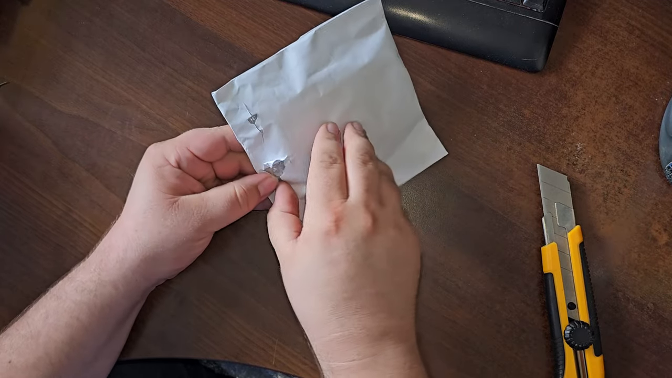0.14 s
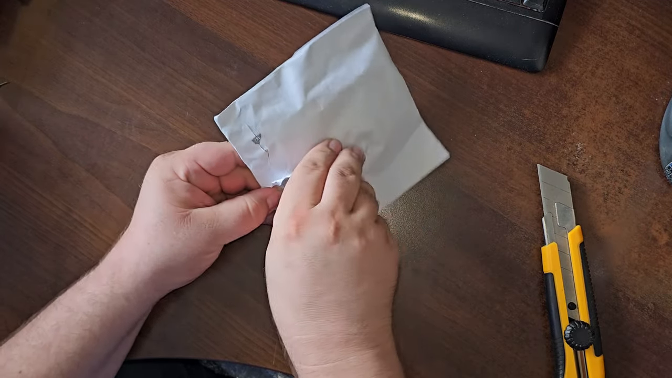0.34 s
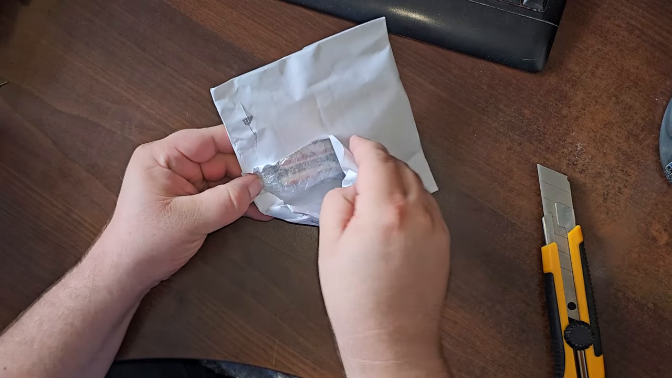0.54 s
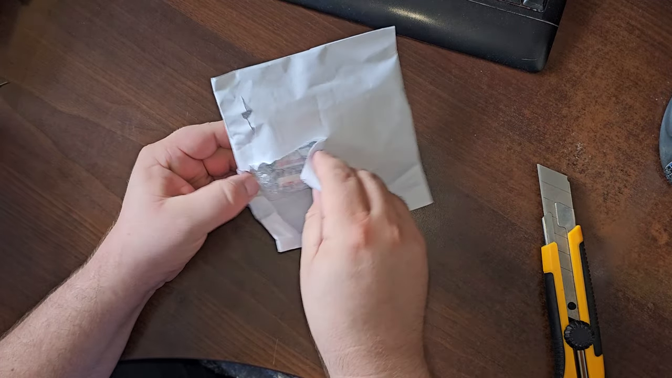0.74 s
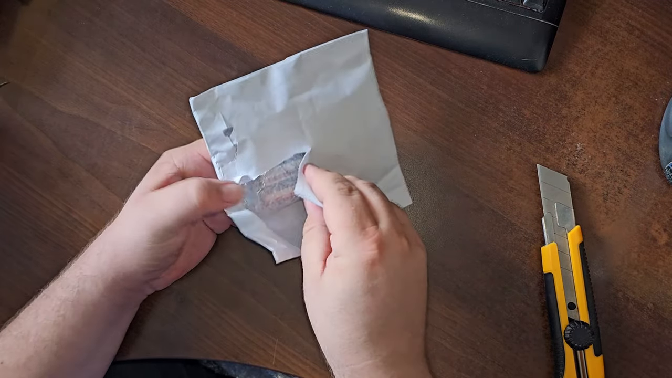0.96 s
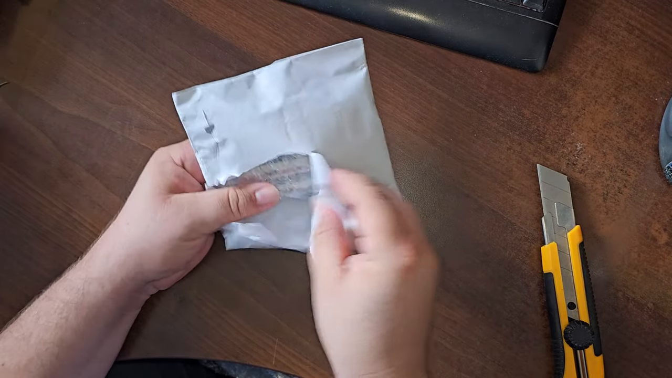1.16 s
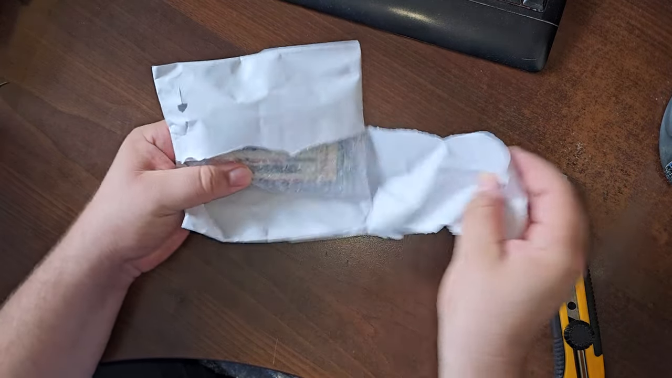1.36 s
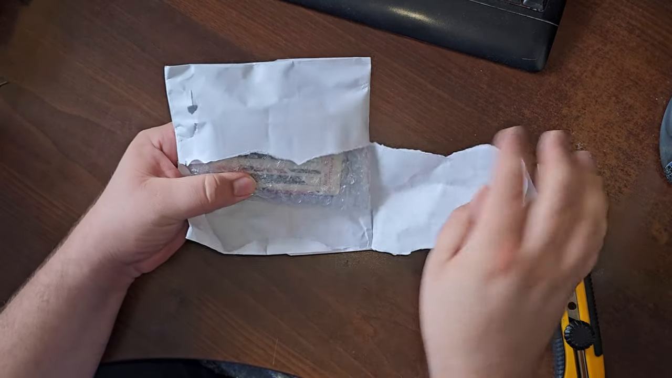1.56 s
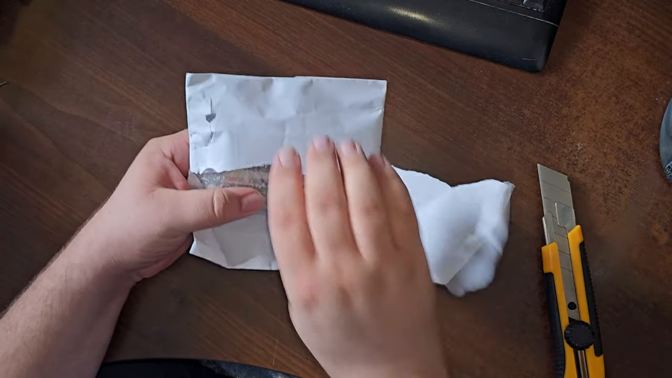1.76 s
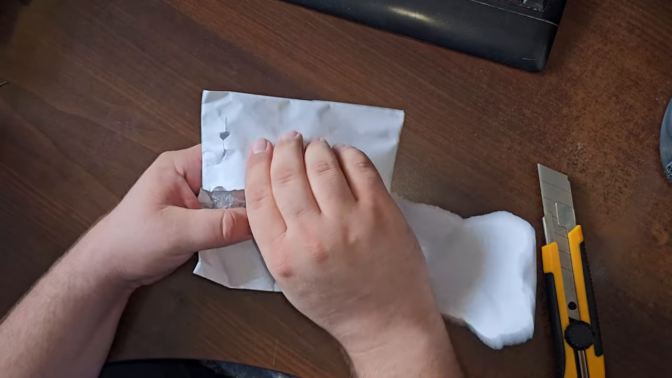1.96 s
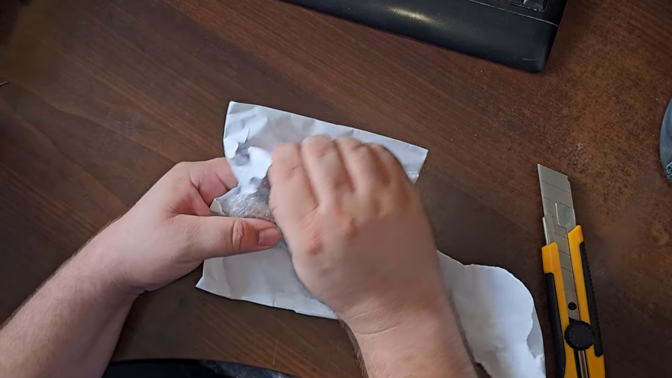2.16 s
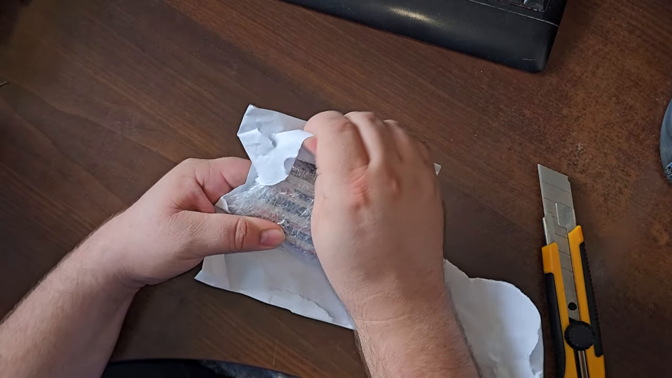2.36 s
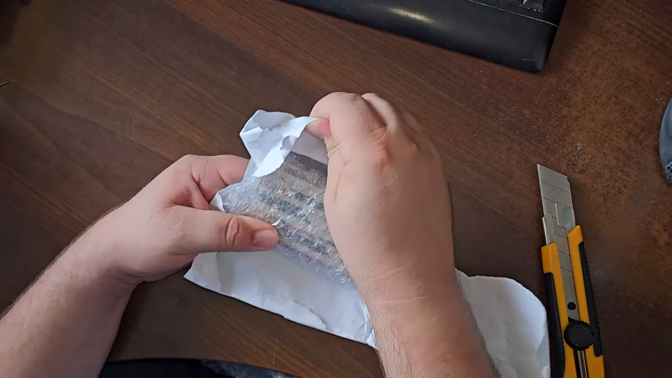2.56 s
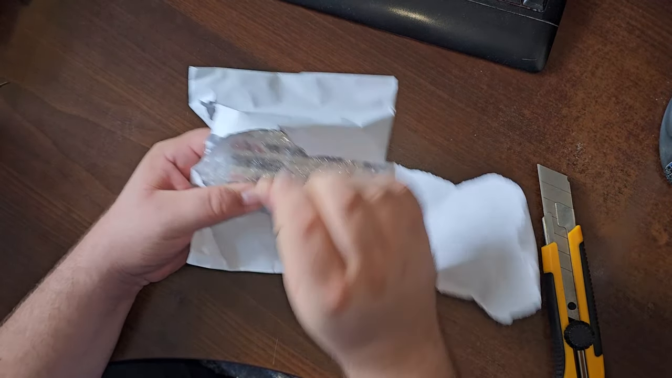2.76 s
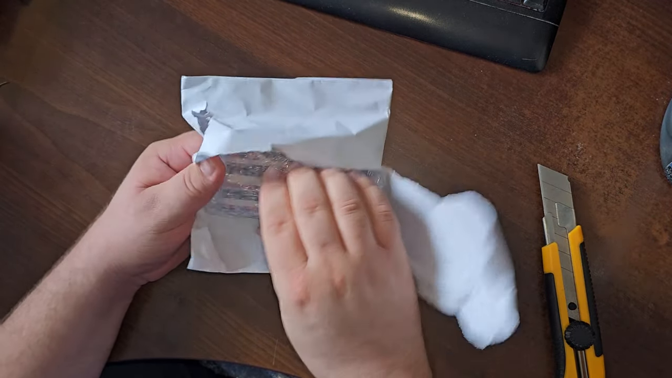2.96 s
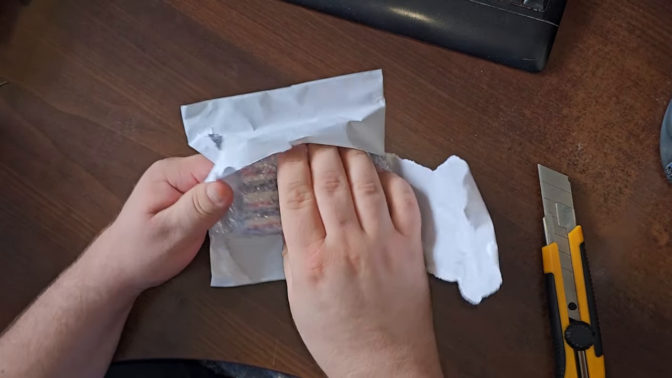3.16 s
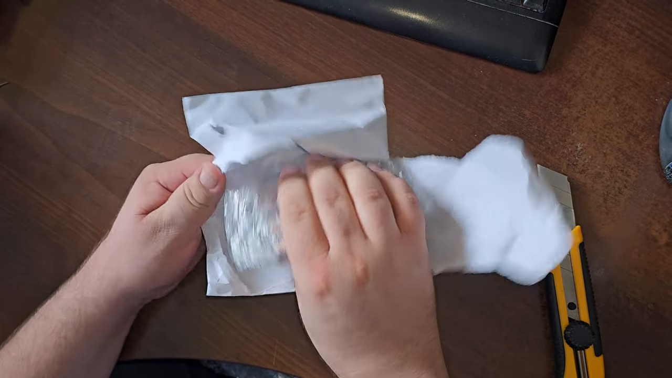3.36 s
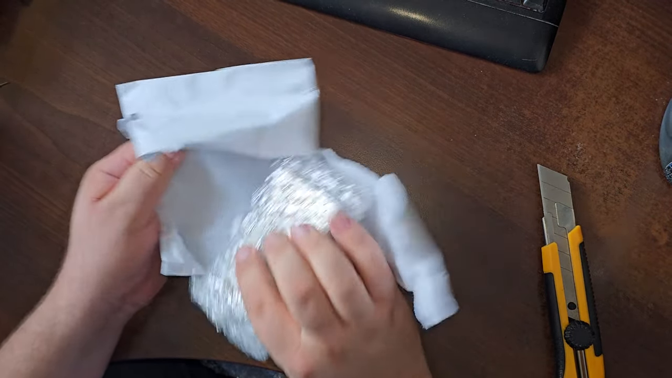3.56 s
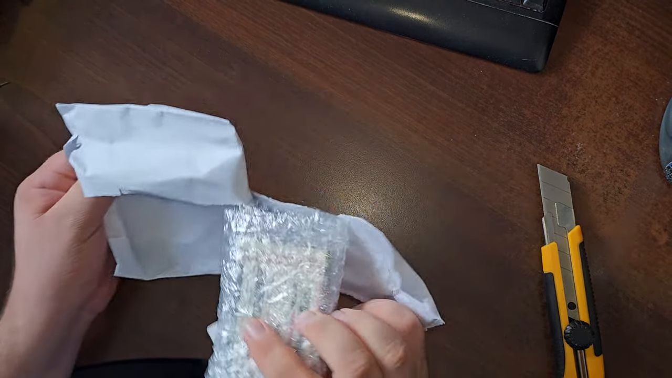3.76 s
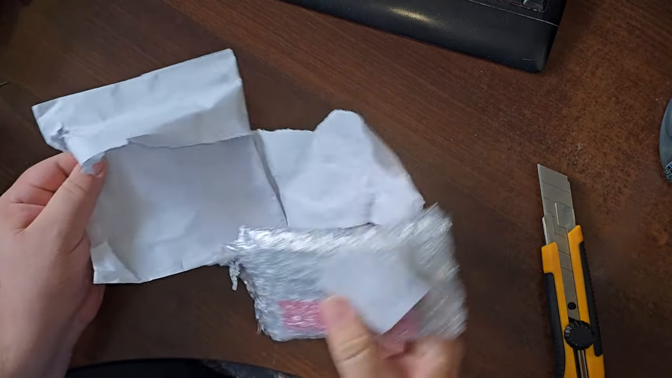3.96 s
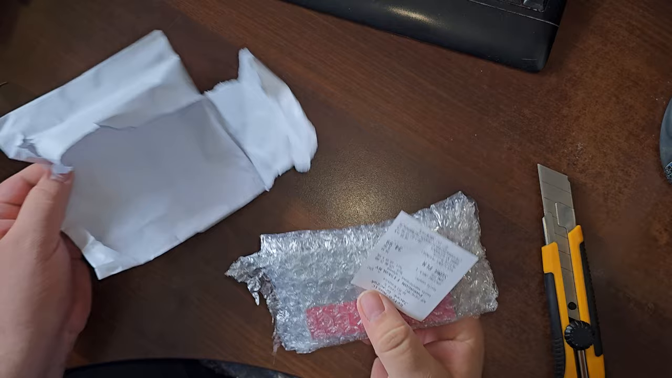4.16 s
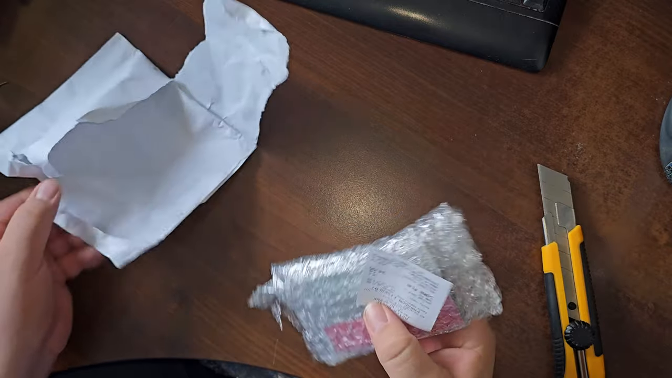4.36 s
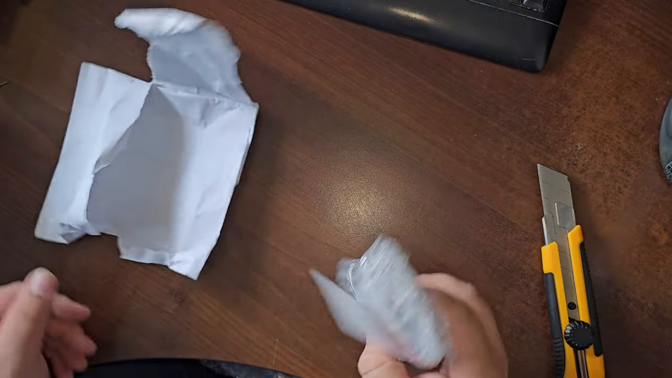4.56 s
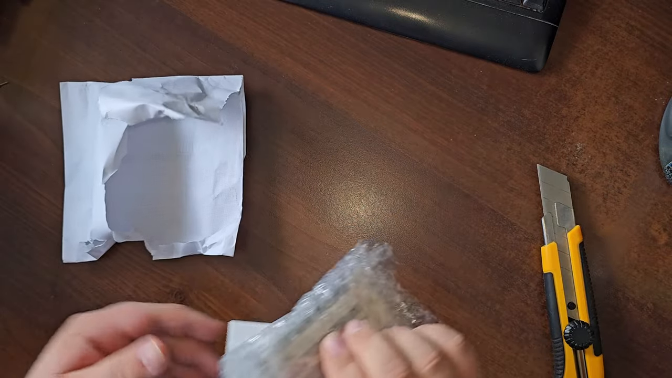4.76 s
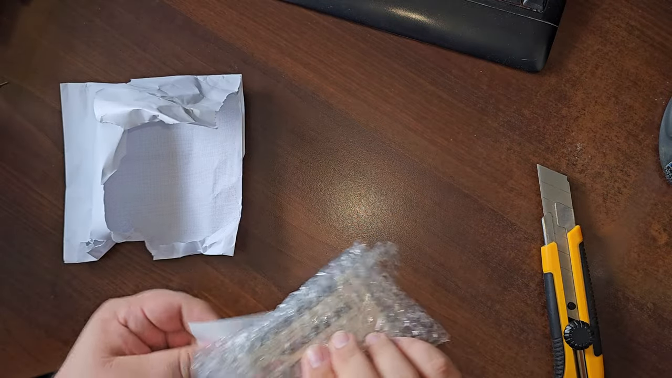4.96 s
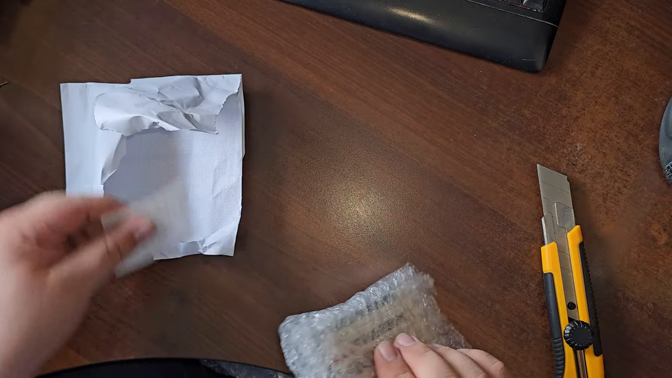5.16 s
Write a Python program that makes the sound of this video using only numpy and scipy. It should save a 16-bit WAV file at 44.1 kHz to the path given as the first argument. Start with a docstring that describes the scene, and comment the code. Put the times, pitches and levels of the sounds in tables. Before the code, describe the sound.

A close, dry stereo sound, slightly to the left, in a small room with soft low air noise and faint hum. Fingers rustle a paper envelope from the start, with small crackles and a crease snap. At about 0.3-0.6 s a short fibrous rip comes with bright popping creases. Light rubbing follows until the longest, loudest tear at 1.1-1.45 s, coarse and raspy with a fluttering flap. Soft handling continues, then a brief third rip at 2.07-2.2 s. From 2.25 to 2.9 s the paper is folded back with busy crackle and sharp pitched snaps. Around 3-3.9 s bubble wrap crinkles and scrapes as it slides out, while dragging makes a faint desk rumble. A low 60 Hz drone swells from about 3.1 to 3.7 s, then slowly sinks. After 4 s only sparse, gentle film rustles remain, with a small crisp flurry near 4.9 s.

```python
"""A wooden desk in a small humming room, heard close up and in stereo, with the scene slightly to the left.
Hands rip a paper envelope open in three pulls, fold it back and slide out a bubble-wrapped item.
Tearing is a stream of breaking fibres that shakes the loose flap; creases buckle with short pitched snaps.
Paper and plastic film rustle in between as crackle and small rings, the desk rumbles when things drag on it,
and a low drone swells late."""
import sys
import numpy as np
from scipy import signal
from scipy.fft import rfft, irfft, next_fast_len
from scipy.io import wavfile
from scipy.ndimage import uniform_filter1d, map_coordinates

SR = 44100
rng = np.random.default_rng(int(sys.argv[2]) if len(sys.argv) > 2 else 0)


def generate_wav(sig):
    """Save sig (samples, or channels by samples) to the path in sys.argv[1] as 16-bit PCM at SR."""
    pcm = np.round(np.clip(np.atleast_2d(sig).T, -1, 1) * 32767).astype(np.int16)
    wavfile.write(sys.argv[1], SR, pcm)


N = 229742  # samples

# Levels in the tables are before the mix; a stroke's length runs between the points 8 dB below its peak.
# The three pulls that rip the paper, a list for each: time_s, force_db, flap_ring_hz
PULLS = [
    [(0.325, -46, 1010), (0.35, -24.5, 990), (0.415, -26, 1450), (0.48, -29, 1420), (0.55, -36, 1230),
     (0.585, -53, 1250)],
    [(1.1, -38.5, 1860), (1.17, -20.5, 1850), (1.22, -20.5, 1320), (1.265, -16, 880), (1.31, -20, 950),
     (1.36, -19, 1235), (1.395, -26.5, 1200), (1.425, -33.5, 1140), (1.455, -63, 1150)],
    [(2.07, -24, 1320), (2.088, -30, 1140), (2.17, -33, 1440), (2.21, -55, 1420)],
]
# Fingers stroking and folding the envelope: peak_s, length_s, level_db, brightness_db (fizz against body)
PAPER_STROKES = [(0.0, 0.027, -34.5, -2.5), (0.056, 0.08, -40, -1), (0.208, 0.095, -44, -10),
                 (0.285, 0.13, -37, 2), (0.65, 0.13, -50, 4), (0.7, 0.055, -43, 2.5),
                 (0.817, 0.088, -45.5, 2.5), (0.96, 0.1, -46, 3), (1.1, 0.04, -45, -8),
                 (1.525, 0.18, -51, 0.5), (1.703, 0.15, -50, -2), (1.782, 0.056, -45, -11),
                 (1.882, 0.058, -43.5, 2), (1.99, 0.11, -46.5, 0), (2.265, 0.25, -41, 4),
                 (2.38, 0.061, -36, 2.5), (2.51, 0.29, -46, 0), (2.675, 0.12, -45, 4),
                 (2.822, 0.11, -48.5, 3.5)]
# Shoves and turns of the bubble wrap: peak_s, length_s, level_db, brightness_db (fizz against body)
WRAP_STROKES = [(2.965, 0.074, -42.5, 1.5), (3.033, 0.085, -43, -0.5), (3.145, 0.1, -39.5, 0),
                (3.255, 0.088, -45, -3), (3.345, 0.21, -41, 3.5), (3.475, 0.089, -44.5, 5.5),
                (3.55, .15, -43.5, 2), (3.702, 0.065, -40, 4), (3.872, .15, -41, 4),
                (4.02, 0.41, -55, -4.5), (4.26, 0.079, -56.5, -0.5), (4.355, 0.14, -51.5, -0.5),
                (4.453, 0.035, -61, 10.5), (4.67, 0.12, -69.5, 13), (4.885, 0.05, -47.5, 7),
                (4.922, 0.028, -45.5, 4), (4.967, 0.064, -51, 4), (5.11, 0.076, -62, 4),
                (5.205, 0.041, -58.5, 7.5)]
PAPER_REST_DB, WRAP_REST_DB = -65, -72.5  # faint rustle between strokes


def rips():
    """The tear runs in small jerks; fibres fizz, the sheet rasps and the flap flutters."""
    # colour of tearing paper: freq_hz, density_db
    torn_colour = [(90, -16.5), (160, -13), (280, -9.5), (380, -10), (520, -2), (760, -8), (1050, -9.5),
                   (1500, 4.5), (2300, -2.5), (4500, -11.5), (6900, -16.5), (11300, -16.5), (16000, -19.5)]
    flutter, sheet, fizz = pulls()
    fibres = crackle(rate=2200, spread_db=2.0, life=0.0018, scatter=0.12)
    flap_hz = curves([row for rows in PULLS for row in rows])[1]
    ring = pips(flap_hz, rate=700, spread_db=2.5, detune=0.198, cycles=2.8)
    rasp = amp(0.5) * part(fibres, torn_colour, 580, 2490) + amp(-4.0) * ring
    tear = flutter * part(fibres, torn_colour, 64, 538, order=8)
    tear += sheet * rasp
    tear += fizz * part(fibres, torn_colour, 1920, 14800)
    jerks_db = 1.1 * wobble(130)
    return tear * amp(jerks_db)


def pulls():
    """Flutter, sheet and fizz gains: all follow the force, and the flap takes over as the tear lengthens."""
    full_force_db = -15.5  # a hard pull
    # flap and fibres: level at the start of a hard pull, growth in dB per dB of force, drift as the tear lengthens
    flutter_db, flutter_grows, flutter_db_per_s = -17, 1.02, 27
    fizz_db, fizz_grows, fizz_db_per_s = 1.5, 0.89, -1
    t = np.arange(N) / SR
    gains = np.zeros((3, N))
    for rows in PULLS:
        start, end = rows[0][0], rows[-1][0]
        gate = uniform_filter1d(1. * ((t >= start) & (t <= end)), size=200)
        force = curves(rows)[0] - full_force_db
        age = np.clip(t, start, end) - start
        flutter = flutter_db + flutter_grows * force + flutter_db_per_s * age
        fizz = fizz_db + fizz_grows * force + fizz_db_per_s * age
        gains += gate * amp(full_force_db + np.array([flutter, force, fizz]))
    return gains


def handling():
    """Skin and paper catch and slip on the envelope; small wrinkles tick."""
    # colour of rubbed paper: freq_hz, density_db
    rubbed_colour = [(150, -23), (250, -28), (414, -5.5), (618, -21), (698, -6.5), (1080, -11), (1400, -2),
                     (1610, -7.5), (3010, -1.5), (3650, -3.5), (5540, -11.5), (7310, -12), (8550, -15.5),
                     (15200, -10.5), (16000, -23)]
    sheet, fizz = strokes(PAPER_STROKES, PAPER_REST_DB)
    slips = crackle(rate=900, spread_db=3.0, life=0.0038, scatter=0.21)
    slips = slips * amp(2 * wobble(110))  # uneven level
    ticks = pips(1452, rate=240, spread_db=-2, detune=0.236, cycles=1.9)
    body = amp(-0.5) * part(slips, rubbed_colour, 230, 1910) + amp(-5.5) * ticks
    return sheet * body + fizz * part(slips, rubbed_colour, 4200, 11600)


def bubble_wrap():
    """Film bubbles scrape past the paper with a fine crinkle, sparser when gentle, and tick as they flex."""
    # colour of plastic film: freq_hz, density_db
    film_colour = [(150, -40), (250, -5), (354, -13.5), (429, -5.5), (629, -11.5), (761, -6.5),
                   (1080, -13.5), (1450, -5), (1670, -27), (2050, -4.5), (2490, -8.5), (3400, -6.5),
                   (5730, -17.5), (15200, -23), (16000, -30)]
    crinkles_per_s, firm_shove_db, thinning = 1700, -42, .8  # rate at a firm shove, its level, power law
    body, fizz = strokes(WRAP_STROKES, WRAP_REST_DB)
    pace = np.clip((body / amp(firm_shove_db)) ** thinning, .1, 2)
    crinkle = crackle(rate=crinkles_per_s * pace, spread_db=0.5, life=0.0025, scatter=0.23)
    crinkle = crinkle * amp(1.5 * wobble(110)) / np.sqrt(pace)  # density alone leaves the level even
    ticks = pips(1627, rate=300 * pace, spread_db=-0.5, detune=0.222, cycles=2.3)
    ticks = unit(ticks / np.sqrt(pace))
    scrape = part(crinkle, film_colour, 320, 2370) + amp(-5) * ticks
    return body * scrape + fizz * part(crinkle, film_colour, 4000, 22000)


def snaps():
    """A crease gives a little, then flips: a thump of air, a short ring of the facet and a crack."""
    # the loud creases buckling: time_s, ring_hz, level_db, crack_db (against the ring)
    loud_creases = [(0.185, 1120, -37.5, -26), (0.196, 1150, -37.5, 0.5), (0.282, 1120, -25, -4.5),
                    (0.292, 1020, -37, -10), (0.312, 2210, -37.5, -8), (0.41, 1390, -25, -15),
                    (0.422, 1520, -26, -23), (0.525, 1180, -33.5, -10), (0.738, 1340, -45.5, -19),
                    (0.983, 1400, -58, 5), (1.028, 1260, -52, -2), (1.082, 1590, -40.5, 0),
                    (1.111, 1780, -29, -10), (1.124, 1910, -30, -17), (1.138, 1880, -27, -1.5),
                    (1.414, 1380, -30.5, -22), (1.422, 291, -33, -26), (1.53, 1340, -46, -8),
                    (1.567, 580, -46.5, -26), (1.688, 1410, -43, 0.5), (2.026, 3380, -30.5, -12),
                    (2.072, 590, -36.5, 9.5), (2.175, 3440, -36, -2), (2.26, 2140, -31, -7),
                    (2.266, 2400, -26, -6), (2.345, 3600, -32.5, -4), (2.393, 532, -35.5, -6),
                    (2.425, 850, -32, -9), (2.436, 3500, -39, -9), (2.461, 1450, -28.5, -5),
                    (2.473, 770, -29.5, -20), (2.522, 1490, -37, -22), (2.535, 1390, -35, -10),
                    (2.562, 766, -32, -17), (2.64, 1220, -31, -17), (2.702, 1340, -37, -16),
                    (2.751, 1310, -43.5, -28), (2.796, 1430, -47, -2), (2.948, 1330, -40, -18),
                    (3.034, 470, -40.5, -12), (3.081, 2740, -36, -5), (3.084, 3480, -32, 0.5),
                    (3.333, 1470, -36.5, -9.5), (3.448, 4086, -30, -1.5), (3.492, 1460, -35.5, -6),
                    (3.676, 810, -45, -16), (3.798, 707.7, -48, -12), (4.279, 443.7, -51.5, -4),
                    (4.314, 454, -45.5, -15), (4.553, 1561, -52.5, -3), (4.884, 2217, -39.5, 0.5),
                    (4.922, 2374, -48.5, -9.5)]
    # colour of a buckling crease: freq_hz, density_db
    crease_colour = [(71, -38), (120, -21), (251, -16.5), (698, -1.5), (1340, 2.5), (1680, 3.5),
                     (2430, 0.5), (2750, 0), (3590, 3.5), (5750, -3.5), (6630, -7), (9990, -13),
                     (16000, -16)]
    thump_db, thump_db_per_octave = -8.5, -5  # for a facet that rings at 1 kHz; smaller facets push less air
    out = np.zeros((2, N + SR))
    t = np.arange(SR // 40) / SR
    for s, hz, db, crack_db in loud_creases + small_snaps():
        shock = stereo(flick(life=0.0038, scatter=0.29))
        tone = np.sin(2 * np.pi * hz * t - [[0], [.3]])  # the right lags by 0.3 rad
        ring = unit(tone * (1 - np.exp(-t / 0.0005)) * np.exp(-hz * t / 1.8))
        ring = ring * min(1, 1800 / hz)  # small stiff facets click more than they ring
        octaves = np.log2(hz / 1000)
        snap = amp(thump_db + thump_db_per_octave * octaves) * part(shock, crease_colour, 126, 686, order=8)
        snap += unit(part(shock, crease_colour, 640, 2790, order=8) + amp(3.5) * ring)
        snap += amp(crack_db) * part(shock, crease_colour, 4280, 22000, order=8)
        yielding = stereo(flick(life=0.0039, scatter=0.65))
        give = amp(-19.0) * part(yielding, crease_colour, 290, 5700)
        out[:, round(s * SR):][:, :len(t)] += amp(db) * snap
        give_s = s - rng.uniform(.0025, .006)
        out[:, round(give_s * SR):][:, :len(t)] += amp(db) * give
    return out[:, :N]


def small_snaps():
    """Lesser creases give way at random, as hard as the paper or film is being worked."""
    snaps_per_s, typical_hz, crack_db = 16, 1498, -7
    against_rustle_db = -5
    rip_db = -5  # small snaps are softer against the rip than against the rustle
    effort = amp(rip_db) * pulls()[1]
    effort = effort + strokes(PAPER_STROKES, PAPER_REST_DB)[0] + strokes(WRAP_STROKES, WRAP_REST_DB)[0]
    at = np.flatnonzero(rng.random(N) < snaps_per_s / SR)
    at = at[at > SR // 100]  # leaves time for the give ahead of the snap
    pitch, size = rng.standard_normal((2, N))[:, at]
    ring_hz = typical_hz * np.exp(0.22 * pitch)
    level_db = 20 * np.log10(effort[at]) + against_rustle_db + 2 * size
    return [(i / SR, hz, db, crack_db) for i, hz, db in zip(at, ring_hz, level_db)]


def desk():
    """Dragging over the wood makes the desk top rumble unevenly."""
    # forearms and envelope dragging on the desk: peak_s, length_s, level_db
    drags = [(0.3, 0.91, -57.5), (1.8, 1.05, -58), (3.017, 0.37, -53), (3.753, 0.44, -51.5),
             (4.332, 0.088, -56)]
    # colour of the desk top: freq_hz, density_db
    wood_colour = [(40, -1), (80, -5), (160, -5), (300, -8), (600, -14)]
    rumble = part(stereo(rng.standard_normal((2, N))), wood_colour, 49, 560)
    return sum(swell(*row) for row in drags) * amp(0.9 * wobble(25)) * rumble


def room(x, count):
    """The small room answers each of count stretches of time with its own randomly drawn tail."""
    # late decay of the small room: freq_hz, t60_s
    decay_times = [(150, 0.13), (700, 0.24), (1500, 0.18), (4000, 0.27), (14000, 0.2)]
    wet = np.zeros((2, N + SR))
    edges = np.linspace(0, N, count + 1).astype(int)
    for a, b in zip(edges, edges[1:]):
        hz, t, z = signal.stft(rng.standard_normal((2, SR // 3)), SR, nperseg=256)
        decay = amp(-60 * t / along(decay_times, hz)[:, None])
        decay = decay * (1 + 4.6 * np.exp(-t / 0.023))  # stronger early reflections
        tail = stereo(signal.istft(z * decay, SR, nperseg=256)[1])
        tail = np.pad(tail, ((0, 0), (150, 0)))  # 3.4 ms before the room answers
        echo = signal.fftconvolve(x[:, a:b], tail / np.linalg.norm(tail[0]), axes=1)
        wet[:, a:a + echo.shape[1]] += echo
    return wet[:, :N]


def background():
    """Room air as coloured noise, faint tones that waver slightly and a wavering low drone."""
    # colour of the room air: freq_hz, density_db
    air_colour = [(20, 3.5), (45, 4.5), (86, 6), (160, -0.5), (250, -5), (450, -6), (700, -4), (980, -19.5),
                  (1280, -15), (1600, -32), (2100, -16), (3000, -24), (6000, -23), (16000, -31)]
    # stereo width of the room air: freq_hz, side_against_mid_db
    air_width = [(60, -11), (110, -15), (200, -5.5), (380, -2), (700, -2.5), (1290, 11), (2380, -4),
                 (4400, 3), (8120, 0), (15000, 3)]
    # tones in the room: freq_hz, typical level_db
    hum_tones = [(102.3, -61.5), (193.8, -66), (333.8, -63.5), (393, -77.5), (532.9, -66), (748.3, -67.5)]
    drone_swell_s, drone_rise_s, drone_sag_db_per_s = 3.13, 0.61, 5.5  # swells late, then sinks slowly
    drone_faint_db, drone_loud_db = -70, -48.5
    t = np.arange(N) / SR
    air = part(stereo(rng.standard_normal((2, N)), air_width), air_colour, 22, 18000)
    hum = 0
    for hz, db in hum_tones:
        level = amp(db + wobble(4.0))
        hum = hum + level * unit(np.sin(2 * np.pi * hz * t + 0.36 * wobble(3.07)))
    swell_end_s = drone_swell_s + drone_rise_s
    drone_db = np.interp(t, [drone_swell_s, swell_end_s], [drone_faint_db, drone_loud_db])
    drone_db -= drone_sag_db_per_s * np.maximum(t - swell_end_s, 0)
    drone = amp(drone_db + wobble(21)) * unit(np.sin(2 * np.pi * 60 * t + 1.4 * wobble(14)))
    return amp(-51.5) * air + hum + drone


def crackle(rate, spread_db, life, scatter):
    """Stereo crackle from many facets of a sheet, each break drawing one of 200 shocks."""
    impulses = breaks(rate, spread_db)
    at = np.flatnonzero(impulses)
    shocks = np.array([flick(life, scatter)[:, :SR // 150] for _ in range(200)])
    waves = impulses[at, None, None] * shocks[rng.integers(len(shocks), size=len(at))]
    where = (at[:, None] + np.arange(waves.shape[2])).ravel()
    return stereo([np.bincount(where, waves[:, c].ravel(), N)[:N] for c in range(2)])


def flick(life, scatter):
    """Mid and side shock of one break: a sharp front, then waves crossing the sheet and bouncing off the desk."""
    t = np.arange(SR // 40) / SR
    shock = scatter * rng.standard_normal((2, len(t))) * np.exp(-(t / life) ** 2)  # life in s
    shock[0, 0] += 1
    shock[1, rng.integers(6)] += rng.choice([-1, 1])  # the side front comes up to 5 samples later
    return shock / np.linalg.norm(shock[0])


def pips(pitch_hz, rate, spread_db, detune, cycles):
    """Small tugs ring a patch of the sheet for a few cycles, each near the given pitch."""
    tugs = breaks(rate, spread_db)
    at = np.flatnonzero(tugs)
    pitch = (pitch_hz * np.exp(detune * rng.standard_normal(N)))[at, None]
    k = np.arange(SR // 60)
    turns = pitch * k / SR
    rings = tugs[at, None] * np.sin(2 * np.pi * turns) * np.exp(-turns / cycles) * (1 - np.exp(-turns))
    sideways = rng.standard_normal((len(at), 1))  # each patch faces its own way
    where = (at[:, None] + k).ravel()
    return unit(stereo([np.bincount(where, r.ravel(), N)[:N] for r in (rings, rings * sideways)]))


def breaks(rate, spread_db):
    """Random impulses, rate a second; a positive spread gives many small and a few large."""
    sizes = amp(spread_db * np.minimum(rng.standard_exponential(N), 3.5))
    return (rng.random(N) < rate / SR) * sizes * rng.choice([-1, 1], N)


def swell(s, length, db):
    """Gain of one stroke of the hand: it speeds up, peaks and slows down."""
    rise_share, end_drop_db, roundness = 0.5, 8, 1.38  # share of the length spent rising, drop at the ends
    t = np.arange(0, N, 40)  # a coarse grid is enough
    away = np.maximum((s - t / SR) / rise_share, (t / SR - s) / (1 - rise_share)) / length
    return np.interp(np.arange(N), t, amp(db - end_drop_db * np.abs(away) ** roundness))


def strokes(rows, rest_db):
    """Body and fizz gains of a run of strokes over a resting rustle, added as powers."""
    body = np.array([swell(s, length, db) for s, length, db, _ in rows])
    fizz = body * amp(np.array(rows)[:, 3:])
    return [np.sqrt(np.sum(g ** 2, axis=0) + amp(rest_db) ** 2) for g in (body, fizz)]


def stereo(pair, width=None):
    """Left and right from a mid and a side signal; by default bass is nearly alike in both, treble unrelated."""
    # width of the close sounds, the desk and the room tail: freq_hz, side_against_mid_db
    usual_width = [(100, -16), (500, -14.5), (1000, -9.5), (2000, -3.5), (4000, 0), (14000, -.5)]
    points = usual_width if width is None else width
    side = coloured(pair[1], lambda hz: amp(along(points, hz)))
    return np.array([pair[0] + side, pair[0] - side])


def part(x, spectrum, lo_hz, hi_hz, order=5):
    """One band of a coloured sound, at rms 1."""
    return unit(coloured(x, band(spectrum, lo_hz, hi_hz, order)))


def band(spectrum, lo_hz, hi_hz, order):
    """Gain of one part of a spectrum, with soft edges."""
    return lambda hz: amp(along(spectrum, hz)) / np.sqrt((1 + (lo_hz / (hz + 1)) ** order) * (1 + (hz / hi_hz) ** order))


def coloured(x, gain):
    """x through the causal, minimum-phase filter that has the given gain over frequency."""
    m = 2 * next_fast_len(x.shape[-1] // 2 + 2048)
    cep = irfft(np.log(np.maximum(gain(np.fft.rfftfreq(m, 1 / SR)), 1e-5)))
    cep[1:m // 2] *= 2  # fold the cepstrum onto positive time
    cep[m // 2 + 1:] = 0
    return irfft(rfft(x, m) * np.exp(rfft(cep)), m)[..., :x.shape[-1]]


def wobble(rate):
    """A smooth random curve, rate knots a second."""
    return map_coordinates(rng.standard_normal(int(N * rate / SR) + 4), [np.arange(N) * rate / SR])


def curves(rows):
    """One value per sample for each column after the time."""
    s, *cols = np.transpose(rows)
    return [np.interp(np.arange(N) / SR, s, c) for c in cols]


def along(points, hz):
    """(Hz, value) points read on a log axis."""
    f, v = np.transpose(points)
    return np.interp(np.log(hz + 1), np.log(f + 1), v)


def unit(x):
    """Scaled to rms 1."""
    return x / np.sqrt(np.mean(x ** 2) + 1e-20)


def amp(db):
    """Decibels to gain."""
    return 10 ** (np.asarray(db) / 20)


def scene():
    """Paper and film close by, their room tail, the desk and the background, all slightly to the left."""
    close = (rips() + handling() + bubble_wrap() + snaps()) * amp([[.5], [-.5]])
    return close + amp(-3) * room(close, count=90) + (desk() + background()) * amp([[.6], [-.6]])


def record(dry):
    """Each microphone port colours the treble; the recorder rounds off tall peaks and cuts above its band limit."""
    # left and right microphone ports, a list for each: freq_hz, gain_db
    port_colours = [
        [(4800, 0), (5900, -2.5), (7400, 0), (9400, -0.5), (10700, -2.5), (11700, 2), (12500, -1.5),
         (15700, 1.5)],
        [(4800, 0), (5900, -1), (6900, -0.5), (7350, 3.5), (8900, -5), (9800, -0.5), (11500, 0.5),
         (12300, -3.5), (15700, -1)],
    ]
    ceiling, top_hz = .9, 15950  # ceiling against full scale
    m = next_fast_len(N + SR // 2)
    hz = np.fft.rfftfreq(m, 1 / SR)
    heard = irfft(rfft(dry, m) * amp([along(port, hz) for port in port_colours]), m)
    rounded = heard / (1 + (heard / ceiling) ** 8) ** (1 / 8)
    return irfft(rfft(rounded) * (hz < top_hz), m)[:, :N]


dry = scene()
out = record(dry)
generate_wav(out)
```